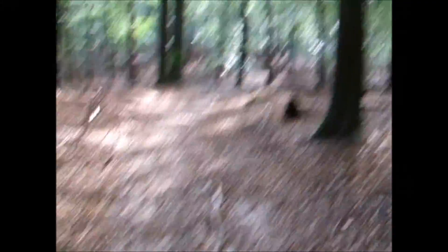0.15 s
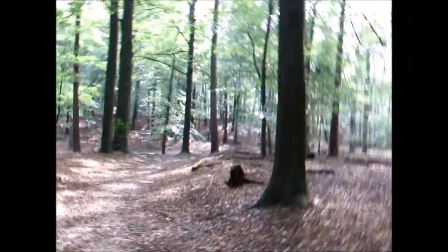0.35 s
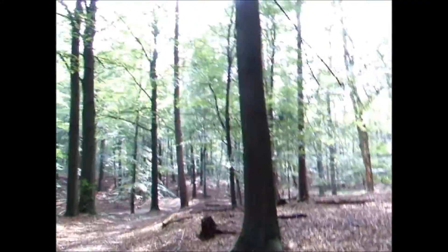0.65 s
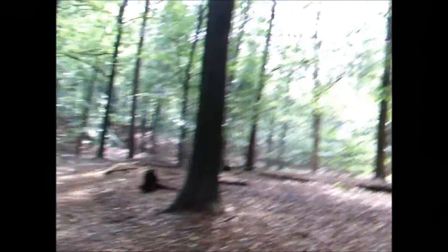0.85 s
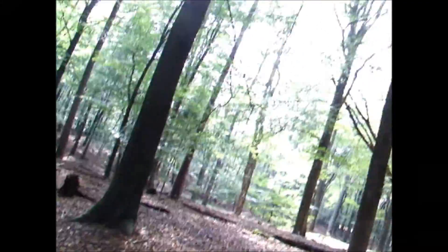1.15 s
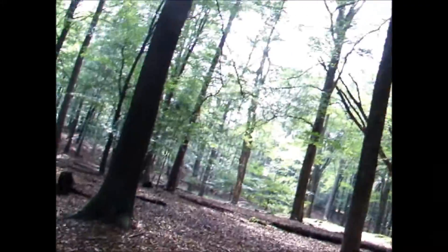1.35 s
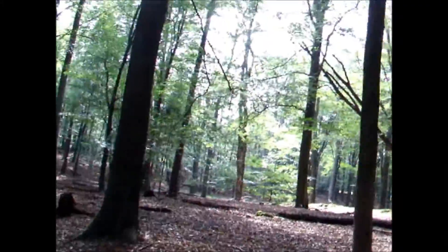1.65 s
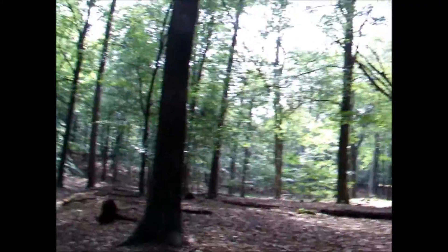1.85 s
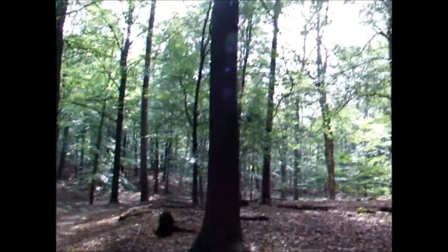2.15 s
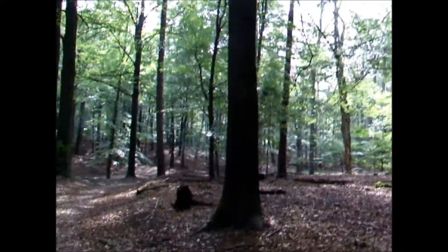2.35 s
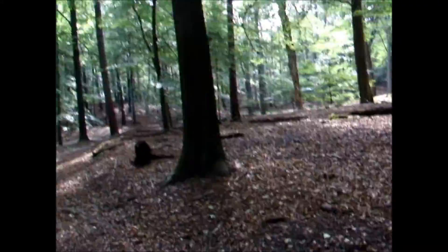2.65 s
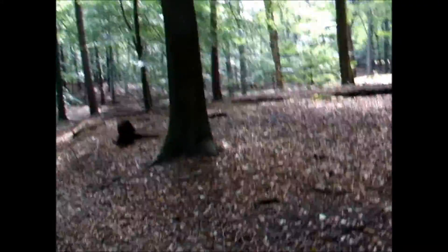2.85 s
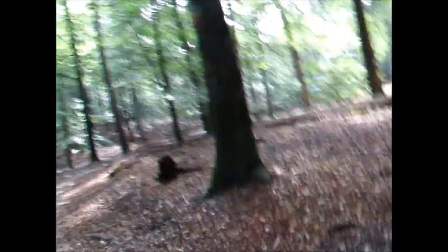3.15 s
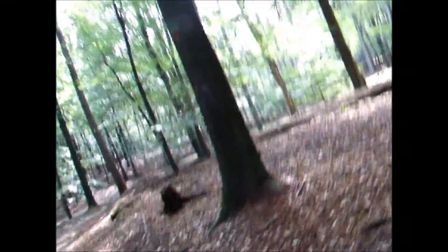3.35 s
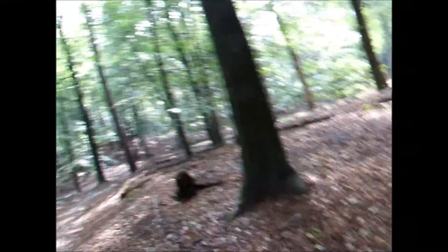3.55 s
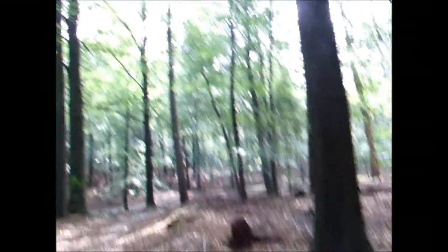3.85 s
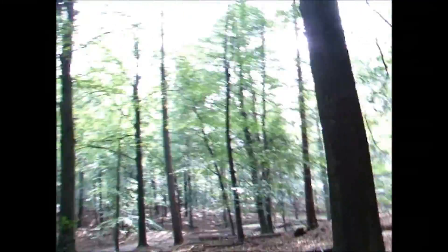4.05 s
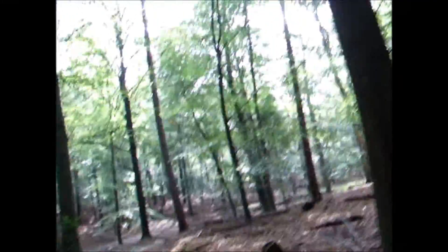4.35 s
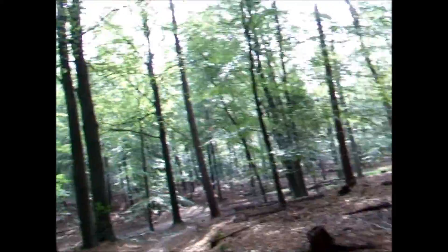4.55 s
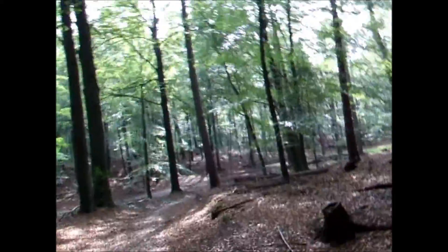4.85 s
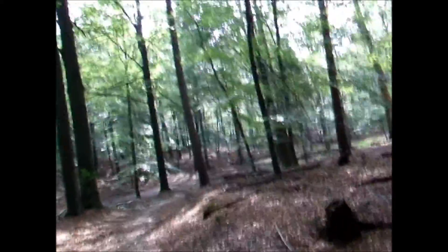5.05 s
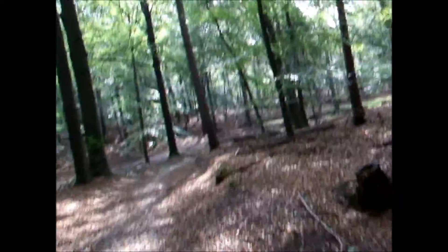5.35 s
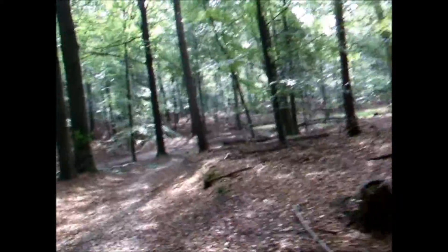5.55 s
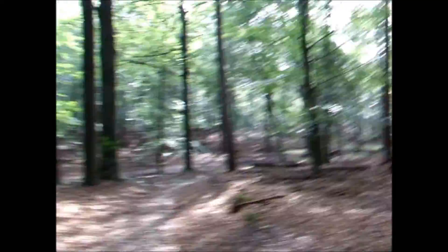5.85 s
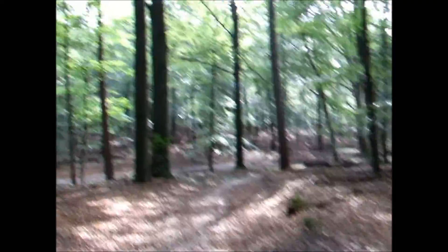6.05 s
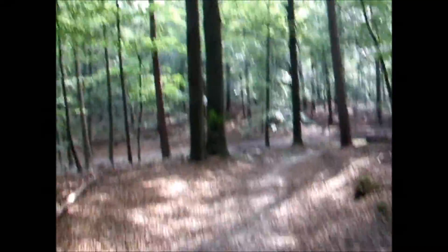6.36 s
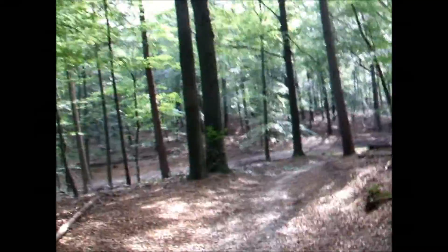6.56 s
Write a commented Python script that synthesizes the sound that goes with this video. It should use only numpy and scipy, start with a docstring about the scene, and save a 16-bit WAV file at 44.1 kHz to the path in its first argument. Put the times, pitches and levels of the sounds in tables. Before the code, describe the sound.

Dry leaf litter crackles and twigs break underfoot in a wood, sparse at first, then a continuous crunching shuffle with dull thuds near the end.

```python
"""First a steady hiss and a faint rumble, then twigs snap and dry leaves crackle in a wood.
Someone turns and shuffles on the leaf litter, holding a small camera; a small metal fitting rattles.
The packed litter creaks and thuds under the soles, a far bird chirps, and soft swishes and whistly
streaks pass. Breaks, chirps and metal are sine tones; hiss, rubbing, swishes and spray are coloured
noise; creaks are uneven pulses and grit ringing through resonances."""
import sys
import numpy as np
from scipy import signal
from scipy.fft import rfft, irfft, next_fast_len
from scipy.io import wavfile
from scipy.ndimage import uniform_filter1d, map_coordinates

SR = 44100
rng = np.random.default_rng(int(sys.argv[2]) if len(sys.argv) > 2 else 0)


def int16_out(signal):
    """Quantize to a 16-bit WAV file."""
    q = np.round(np.clip(np.atleast_2d(signal).T, -1, 1) * 32767)
    wavfile.write(sys.argv[1], SR, q.astype(np.int16))


N = 295029

# rumble from the hand and the air: [t/s, middle level/dB]
HANDLING_LEVELS = [(0.0, -58), (0.74, -53), (1.02, -54.5), (1.45, -52.5), (2.87, -57), (3.2, -54),
                   (3.63, -60.5), (4.21, -52.5), (4.79, -60), (5.79, -48.5), (5.96, -50), (6.22, -59),
                   (6.43, -43.5), (6.69, -54)]
# colour of that rumble: [f/Hz, relative level per Hz/dB]
RUMBLE_COLOUR = [(8.8, -25), (15, 3.5), (29, -12.5), (49, -8.5), (220, -18.5), (290, -51), (480, -120)]
# colour of the microphone hiss: [f/Hz, relative level per Hz/dB]
HISS_COLOUR = [(88, -41), (150, -2), (400, 0.5), (1020, -5), (2450, -4), (5820, -6), (7980, -4.5),
               (10400, -41)]
HISS_DB = -49.5  # rms level
# a far bird's whistles: [t/s, level/dB]
CHIRPS = [(.695, -53), (1.63, -52), (1.965, -52), (2.284, -49), (5.47, -50)]
# contacts of the metal fitting: [t/s, level/dB before a shared lift]
FITTING_CONTACTS = [(1.7138, -40), (1.7217, -27), (3.4738, -43), (3.491, -37), (3.4986, -47),
                    (3.5068, -37.5), (3.516, -40), (3.7016, -39), (3.7163, -34.5), (3.7557, -31.5),
                    (3.7932, -32), (3.825, -34), (3.855, -34.5), (3.872, -36), (3.8852, -33.5),
                    (3.9078, -34)]
# the fitting's ringing tones: [f/Hz, middle relative level/dB, time to fall 60 dB/s]
FITTING_MODES = [(2567, 1.5, 0.028), (4200, -17, 0.027), (4780, -9, 0.06), (5380, -8.5, 0.044),
                 (6030, -11, 0.039)]
# soft swells of grainy noise, wide ones are leafy swishes, narrow ones whistly streaks, perhaps the bird:
# [t/s, length/s, level/dB before the swell, centre f/Hz, width/octaves]
SOFT_SWELLS = [(.57, 0.05, -50.5, 1880, 0.34), (0.876, 0.11, -43, 3520, 0.56),
               (0.913, 0.11, -51, 3180, 0.088), (1.006, 0.13, -51.5, 3100, .2),
               (1.387, 0.035, -48.5, 3000, 0.58), (4.837, 0.1, -47, 2240, 0.35),
               (5.714, 0.087, -41, 2740, 0.49), (6.407, 0.041, -42.5, 2610, 0.1)]
# the feet never quite rest, the shuffle between separate loads: [t/s, creak level/dB]
SHUFFLE_LEVELS = [(0, -73), (1.0, -58), (1.3, -51.5), (1.7, -76.5), (2.8, -60.5), (3.4, -52.5),
                  (3.9, -49.5), (4.5, -52), (5.3, -46), (5.62, -51), (5.9, -49), (6.35, -47.5), (6.69, -51)]
SHUFFLE_CRACKLE_DB, SHUFFLE_RUSTLE_DB = -1.5, 0.5  # the top leaves over the creak
# a sole crunching the top leaves: [t/s, hold/s, crackle level/dB, fine rustle level/dB]
LEAF_CRUNCHES = [(.895, .03, -46.5, -50), (1.17, 0.022, -44.5, -61), (1.25, .07, -57, -53),
                 (2.72, 0.056, -65, -46), (2.94, .04, -49.5, -60), (3.05, 0.44, -53.5, -54),
                 (3.39, 0.076, -44.5, -52), (3.465, .04, -44.5, -40), (3.71, 0.24, -45.5, -41.5),
                 (3.96, 0.073, -45, -55), (4.1, 0.078, -50.5, -49.5), (4.33, 0.071, -45.5, -44),
                 (4.555, 0.091, -47.5, -42.5), (4.66, 0.088, -44.5, -40.5), (4.8, 0.074, -43, -40.5),
                 (5.01, 0.019, -34.5, -44.5), (5.135, .012, -41.5, -54), (5.195, .015, -40.5, -43),
                 (5.262, 0.021, -38, -41), (5.4, 0.13, -38.5, -41.5), (5.7, 0.075, -41.5, -43.5),
                 (5.96, 0.019, -56, -39.5), (6.15, 0.19, -45.5, -45), (6.412, 0.015, -43.5, -43.5),
                 (6.51, 0.022, -38.5, -43), (6.565, 0.032, -44, -44.5)]
CRUNCH_RISE_DB_S, CRUNCH_FALL_DB_S = 333, 249.5  # dB per second
# colour of the coarse rubbing: [f/Hz, relative level per Hz/dB]
CRUNCH_COLOUR = [(900, -25.5), (1400, -18), (2500, -0.5), (4000, -6), (5500, -25)]
# colour of the fine rubbing: [f/Hz, relative level per Hz/dB]
RUSTLE_COLOUR = [(2500, -30.5), (4000, -5.5), (5500, -1), (7300, 4), (8200, -15)]
# each load on the packed litter: [t/s, hold/s, creak level/dB]
CREAK_LOADS = [(.205, .01, -42), (.392, 0.0053, -45.5), (.69, 0.0078, -43.5), (.765, 0.0045, -43.5),
               (.91, .03, -47.5), (1.178, 0.013, -43.5), (1.25, 0.014, -45.5), (1.318, 0.004, -43.5),
               (1.4, 0.079, -43), (1.59, 0.0086, -44), (1.838, 0.0075, -47), (1.9, 0.016, -46),
               (2.172, .01, -45.5), (2.336, 0.027, -39), (2.51, .008, -47.5), (2.65, 0.009, -44.5),
               (2.95, 0.0101, -39.5), (3.27, 0.026, -49), (3.45, 0.037, -40.5), (3.65, 0.0101, -46.5),
               (3.74, 0.018, -42.5), (3.97, 0.089, -39), (4.13, 0.037, -43), (4.245, 0.044, -43.5),
               (4.3, 0.025, -45), (4.34, .1, -43.5), (4.555, 0.027, -45.5), (4.62, .125, -41.5),
               (4.788, 0.0024, -35.5), (4.88, 0.035, -43), (5.02, 0.021, -33.5), (5.136, 0.15, -41.5),
               (5.31, 0.05, -38.5), (5.43, 0.039, -35.5), (5.52, 0.026, -36.5), (5.705, .015, -37),
               (5.772, 0.0069, -27.5), (5.86, 0.038, -43), (6.08, 0.051, -43), (6.172, 0.019, -40),
               (6.254, 0.048, -38), (6.43, .022, -37.5), (6.46, 0.014, -33.5), (6.52, 0.028, -38),
               (6.57, 0.02, -39), (6.61, 0.014, -37)]
CREAK_RISE_DB_S, CREAK_FALL_DB_S = 791, 556.5  # dB per second
# resonances of hollows in the litter: [f/Hz, width/Hz, relative level/dB]
LITTER_HOLLOWS = [(299, 90, -5.5), (420, 56, -1.5), (652, 140, -2), (1102, 77, -6.5), (1270, 110, -11)]
# weight landing on the packed litter: [t/s before a short delay, level/dB before its two parts, f/Hz]
THUDS = [(1.165, -21.5, 645), (3.461, -19.5, 303), (4.244, -20, 674), (4.2967, -21.5, 351),
         (5.016, -18.5, 480), (5.12, -16.5, 705), (5.437, -16, 636), (5.7, -20, 511), (5.766, -11, 600),
         (6.241, -14.5, 393), (6.263, -26.5, 404), (6.459, -21, 640), (6.509, -6, 346), (6.533, -28, 684)]
PUSH_CYCLES, PUFF_T60_S = 1, 0.036  # the push fades to 1/e in these cycles; the puff falls 60 dB
# twigs and stiff leaves breaking:
# [t/s, ring peak/dB, ring f/Hz, dull spray/dB, bright spray/dB (both relative), spray's 60 dB fall/s]
SNAPS = [(0.1913, -25, 1954, -1, -33, 0.017), (0.6759, -31.5, 2060, -14, -30, 0.034),
         (0.8946, -28, 3190, -6, -7, 0.054), (0.9294, -31, 3170, -1, -8, 0.095),
         (1.17, -17.5, 1700, -7, -5.5, 0.077), (1.188, -22.5, 3720, -8, -11, 0.015),
         (1.727, -4.5, 4540, -22, -3.5, 0.049), (1.7598, -20.5, 4110, -17, -8, 0.041),
         (1.778, -18.5, 5440, -11, -3, 0.068), (2.364, -6.5, 3730, -24, -1, 0.036),
         (2.387, -5, 5500, -19, -7, 0.038), (2.4415, -15.5, 3820, -19, -6, 0.042),
         (2.555, -11.5, 4920, -25, -5, 0.031), (2.591, -23.5, 3520, -28, -7.5, 0.063),
         (2.805, -32.5, 1520, 3, -27, 0.027), (2.9246, -26.5, 6650, -27, 3, 0.013),
         (2.9527, -33.5, 1810, 9, -21, 0.06), (3.049, -0.5, 3700, -25.5, -3, 0.034),
         (3.0556, -22, 5380, -51, -19, 0.029), (3.0787, -18.5, 3980, -16.5, -0.5, 0.061),
         (3.182, -40, 1700, 4.5, -25, 0.03), (3.3786, -23.5, 6090, -1, 5.5, 0.06),
         (3.456, -23.5, 2665, -2, 4.5, 0.02), (3.466, -21, 1860, -3, 0, 0.02),
         (3.5707, -10, 4300, -5, -6, 0.023), (3.7843, -22.5, 2515, -13, -26.5, 0.02),
         (4.106, -28, 3060, -18, -8.5, 0.173), (4.3006, -11, 800, -23, -22, 0.01),
         (4.3672, -29, 4300, -14, -6, 0.02), (4.3531, -24, 3000, -17, -7.5, 0.077),
         (4.4788, -29.5, 6360, -22, -1, 0.075), (4.5302, -30, 7160, -28, -17, 0.028),
         (4.6847, -15.5, 7270, -19, -12, 0.045), (4.7831, -16, 7800, -11, -47, 0.07),
         (5.0207, -16, 2720, -5, -30, 0.029), (5.0588, -24.5, 3100, -16.5, -9, 0.062),
         (5.1226, -19.5, 1825, -17, -4, 0.088), (5.1368, -25, 4830, -19, -16.5, 0.028),
         (5.1534, -26, 1670, 2.5, -25, 0.049), (5.2128, -28, 1760, -9, 3, 0.04),
         (5.254, -35.5, 2060, 3, -8, 0.088), (5.315, -24.5, 3060, -5, -31, 0.041),
         (5.3952, -21.5, 6760, -21.5, -18, 0.042), (5.4086, -23, 3250, -6.5, 0.5, 0.068),
         (5.428, -25.5, 2470, -4, -17, 0.047), (5.4996, -20.5, 2780, -4.5, -19, 0.039),
         (5.5562, -26.5, 3360, -4.5, -25, 0.065), (5.5848, -25, 7000, -14, -14, 0.11),
         (5.7038, -25, 5900, -1.5, -3, 0.13), (5.7476, -25, 5850, -6, -6, 0.085),
         (5.9816, -24.5, 7040, 1, 3.5, 0.038), (6.2054, -25, 2720, -29, -5, 0.03),
         (6.2637, -16, 4770, -6.5, -6.5, 0.1), (6.512, -9, 1420, -11, -29, 0.025),
         (6.5147, -12.5, 1300, -15, -31, 0.025)]
# cycles for a 3 kHz ring to fade to 1/e; power law of that count over pitch
SNAP_CYCLES, RING_CYCLES_POWER = 2.44, 0.59
OFFSET = -.003  # steady shift of the wave, full scale 1
TOP_HZ = 8130  # highest grain pitch; also places the final treble cut


def amp(db):
    """Gain of a level in dB."""
    return 10 ** (np.asarray(db) / 20)


def unit(x):
    """x at rms 1."""
    return x / np.sqrt(np.mean(x ** 2) + 1e-20)


def curves(rows):
    """One value per sample for each column after the time."""
    s, *cols = np.transpose(rows)
    return [np.interp(np.arange(N) / SR, s, c) for c in cols]


def wobble(rate):
    """A smooth random curve, rate knots a second."""
    knots = rng.standard_normal(int(N * rate / SR) + 4)
    return map_coordinates(knots, [np.arange(N) * rate / SR])


def filtered(x, response):
    """x times a response, a function of frequency."""
    m = next_fast_len(N + SR // 2)
    return irfft(rfft(x, m) * response(np.fft.rfftfreq(m, 1 / SR)), m)[..., :N]


def noise(spectrum):
    """Noise of rms 1 coloured by (f/Hz, level/dB) points, joined on a log frequency scale."""
    f, db = np.transpose(spectrum)
    white = rng.standard_normal(N)
    return unit(filtered(white, lambda hz: amp(np.interp(np.log(hz + 1), np.log(f + 1), db))))


def band(x, low_hz, high_hz):
    """Keep mainly the part of x between two frequencies."""
    return signal.sosfilt(signal.butter(3, [low_hz, high_hz], "bandpass", fs=SR, output="sos"), x)


def add(track, s, sound):
    """Mix a sound into the track at time s."""
    track[round(s * SR):][:len(sound)] += sound


def patchy(x, depth_db):
    """x with random patches of gain in time and frequency."""
    z = signal.stft(x, nperseg=256)[2]
    field = uniform_filter1d(rng.standard_normal(z.shape), size=5, axis=0)
    field = uniform_filter1d(field, size=8, axis=1)
    return unit(signal.istft(z * amp(depth_db * unit(field)), nperseg=256)[1][:N])


def grains(rate, centre_hz, spread, cycles, size_db, clump_db):
    """Tiny breaks in clumps: damped sines of random pitch, most small, a few large."""
    draw = rng.random((int(rate * N / SR), 4))
    start = (draw[:, 0] * N).astype(int)
    hz = centre_hz * np.exp(spread * (draw[:, 1] + draw[:, 2] - 1))
    hz = np.minimum(hz, TOP_HZ)[:, None]
    size = amp(-size_db * np.log(1 - .995 * draw[:, 3]) + clump_db * wobble(30)[start])
    k = np.arange(128)  # samples in one grain
    shape = size[:, None] * np.sin(2 * np.pi * hz * k / SR) * np.exp(-k * hz / SR / cycles)
    # overlapping grains add up sample by sample
    return unit(np.bincount((start[:, None] + k).ravel(), shape.ravel(), N + len(k))[:N])


def loads(rows, rise_db_s, fall_db_s, floor_db):
    """Level in dB of each column: every load rises, holds and falls back to the floor."""
    t, level = np.arange(N) / SR, np.array(floor_db)
    for s, hold, *db in rows:
        away = rise_db_s * np.maximum(s - t, 0) + fall_db_s * np.maximum(t - s - hold, 0)
        level = np.maximum(level, np.array(db)[:, None] - away)
    return level


def camera():
    """The hand and the air rumble in the camera body; its microphone hisses."""
    rumble_db = curves(HANDLING_LEVELS)[0] + 1.3 * wobble(6.7)
    return amp(rumble_db) * noise(RUMBLE_COLOUR) + amp(HISS_DB) * noise(HISS_COLOUR)


def bird():
    """Short whistles that waver and bend upwards."""
    track, u = np.zeros(N + SR), np.linspace(0, 1, round(0.039 * SR))
    pitch_hz = 2280 + 650 * u ** 2 + 60 * np.sin(40 * u)
    whistle = np.sin(2 * np.pi * np.cumsum(pitch_hz) / SR) * np.sin(np.pi * u)
    for s, db in CHIRPS:
        add(track, s, amp(db) * whistle)
    return track[:N]


def soft_swells():
    """Each swell is grainy noise in one band: a wide band swishes, a narrow one sounds whistly."""
    track = np.zeros(N + SR)
    for s, length, db, hz, octaves in SOFT_SWELLS:
        u = np.linspace(0, 1, round(length * SR))
        white = rng.standard_normal((2, len(u)))
        grain = amp(1.5 * unit(band(white[1], 40, 330)))
        banded = band(white[0], hz * 2 ** (-octaves / 2), hz * 2 ** (octaves / 2))
        swell = np.sin(np.pi * u ** 0.61) ** 0.7
        add(track, s, amp(db) * unit(banded * grain) * swell)
    return track[:N]


def fitting():
    """Every contact rings the metal's modes at new strengths and rasps."""
    track, t = np.zeros(N + SR), np.arange(SR // 8) / SR
    attack = 1 - np.exp(-t / 0.00028)
    for s, db in FITTING_CONTACTS:
        ring = 0
        for hz, level, t60 in FITTING_MODES:
            fading = amp(level + rng.normal(0, 1.0) - 60 * t / t60)
            ring = ring + fading * np.sin(2 * np.pi * hz * t)
        rasp = amp(-6.5 - 60 * t / 0.04) * unit(band(rng.standard_normal(len(t)), 3000, 9600))
        add(track, s, amp(db + 5.0) * (ring + rasp) * attack)
    return track[:N]


def leaves():
    """The top leaves break in coarse and fine grains over their rubbing noise."""
    shuffle_db = curves(SHUFFLE_LEVELS)[0] + np.array([[SHUFFLE_CRACKLE_DB], [SHUFFLE_RUSTLE_DB]])
    crackle_db, rustle_db = loads(LEAF_CRUNCHES, CRUNCH_RISE_DB_S, CRUNCH_FALL_DB_S, shuffle_db)
    coarse = grains(1100, centre_hz=2400, spread=1, cycles=1.2, size_db=5.5, clump_db=2.2)
    crackle = unit(coarse + 0.5 * patchy(noise(CRUNCH_COLOUR), depth_db=5.0))
    fine = grains(2500, centre_hz=6410, spread=0.76, cycles=2.4, size_db=4, clump_db=6.0)
    rustle = unit(fine + 0.66 * patchy(noise(RUSTLE_COLOUR), depth_db=6.0))
    return amp(crackle_db) * crackle + amp(rustle_db) * rustle


def hollows(f):
    """Resonances side by side, with alternating signs."""
    total = 0
    for k, (centre, width, db) in enumerate(LITTER_HOLLOWS):
        resonance = 1j * f * width / (centre * centre - f * f + 1j * f * width)
        total = total + (-1) ** k * amp(db) * resonance
    return total


def creak():
    """Layers stick and slip unevenly, ringing the hollows; light loads keep more of a narrower band."""
    creak_db = loads(CREAK_LOADS, CREAK_RISE_DB_S, CREAK_FALL_DB_S, curves(SHUFFLE_LEVELS))[0]
    slip_rate = 85 * amp(4 * wobble(40))  # slips a second
    slip_count = np.floor(np.cumsum(slip_rate) / SR)
    slips = np.diff(slip_count, prepend=0) * amp(3 * wobble(90))  # one pulse at each new count
    grit = .4 * rng.standard_normal(N) * amp(3 * wobble(25))
    heavy = unit(filtered(band(unit(slips) + grit, 260, 1200), hollows))
    light = unit(band(heavy, 400, 1150))
    # the weight follows both the level now and its average over a third of a second
    smooth_db = uniform_filter1d(creak_db, size=SR // 3)
    weight = np.clip((0.44 * creak_db + 0.56 * smooth_db + 57) / 13, .5, 1)
    return amp(creak_db) * (weight * heavy + (1 - weight) * light)


def thuds():
    """Each landing is a short low push and a puff of noise around the same pitch."""
    track, t = np.zeros(N + SR), np.arange(SR // 6) / SR
    attack = 1 - np.exp(-t / 0.00074)
    for s, db, hz in THUDS:
        push = np.sin(2 * np.pi * hz * t + 1.0) * np.exp(-t * hz / PUSH_CYCLES)
        puff = unit(band(rng.standard_normal(len(t)), hz * 0.37, hz * 2.68))
        puff = puff * amp(-60 * t / PUFF_T60_S)
        add(track, s + 0.00367, amp(db) * attack * (amp(-3.5) * push + amp(-10) * puff))
    return track[:N]


def snaps():
    """A break clicks and rings for a few cycles, then splinters scatter as a dying spray of noise."""
    track, t = np.zeros(N + SR), np.arange(SR // 8) / SR
    for s, db, hz, dull_db, bright_db, t60 in SNAPS:
        white = rng.standard_normal((4, len(t)))
        # a brief crack plus the scatter
        dying = (amp(-60 * t / t60) + amp(-60 * t / 0.016)) * (1 - np.exp(-t / 0.00063))
        splinters = amp(1.33 * unit(band(white[3], 100, 750)))  # the spray comes in uneven bursts
        spray = amp(-7.0) * unit(band(white[0], 2610, 4370))
        spray = spray + amp(dull_db) * unit(band(white[1], 1070, 2290))
        spray = spray + amp(bright_db) * unit(band(white[2], 4130, 8330))
        cycles = SNAP_CYCLES * (hz / 3000) ** RING_CYCLES_POWER
        ring = np.sin(2 * np.pi * hz * t) * np.exp(-t * hz / cycles) * (1 - np.exp(-t / 0.000077))
        ring = ring / np.abs(ring).max()
        add(track, s, amp(db) * (ring + amp(-10.0) * dying * splinters * spray))
    return track[:N]


def scene():
    """All sources at one microphone."""
    background = camera() + bird() + soft_swells() + fitting()
    feet = leaves() + creak() + thuds() + snaps()
    return (background + feet)[None]


def record(dry):
    """Peaks are held below 0.84, a small steady offset is added and the top treble is cut."""
    clipped = dry / (1 + np.abs(dry / .84) ** 10) ** (1 / 10)
    # the cut fades over 500 Hz and ends in silence 130 Hz above TOP_HZ
    return filtered(clipped + OFFSET, lambda hz: np.clip((TOP_HZ + 130 - hz) / 500, 0, 1) ** 3)


dry = scene()
out = record(dry)
int16_out(out)
```